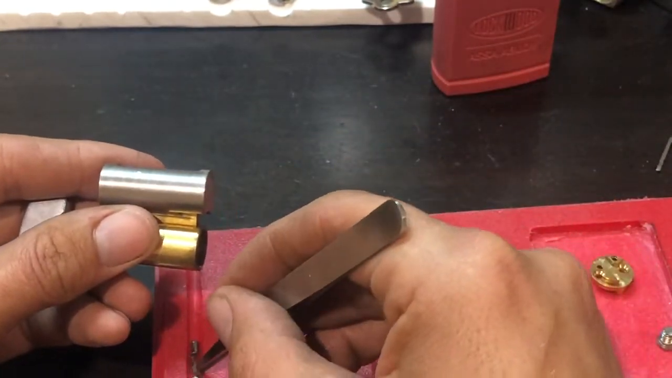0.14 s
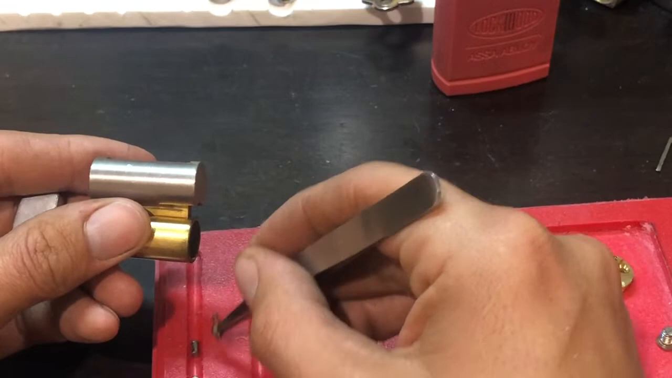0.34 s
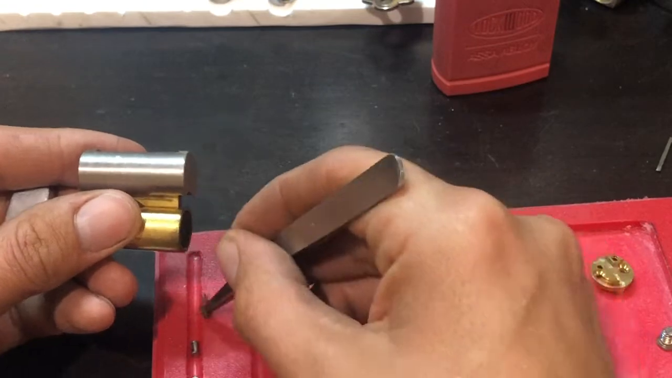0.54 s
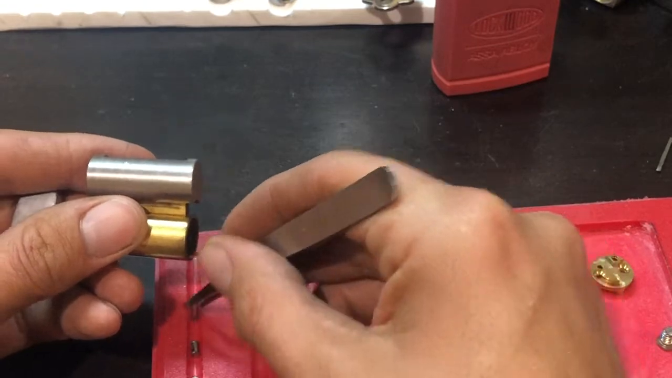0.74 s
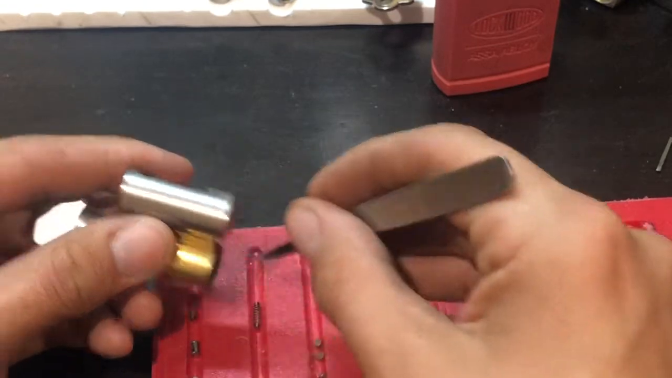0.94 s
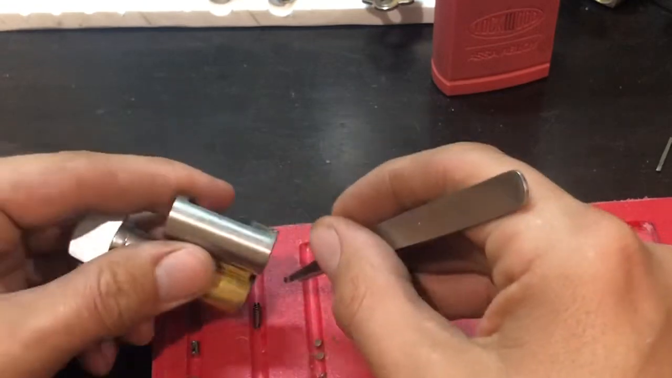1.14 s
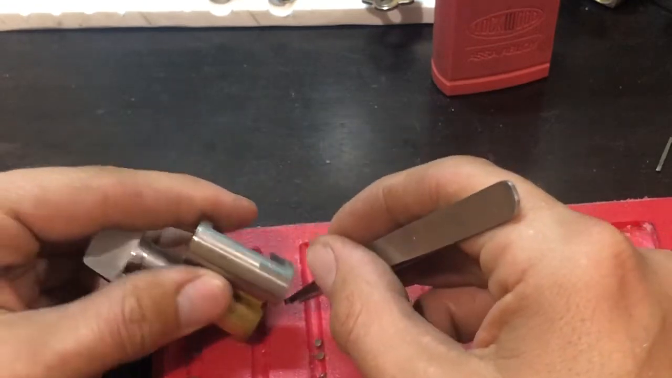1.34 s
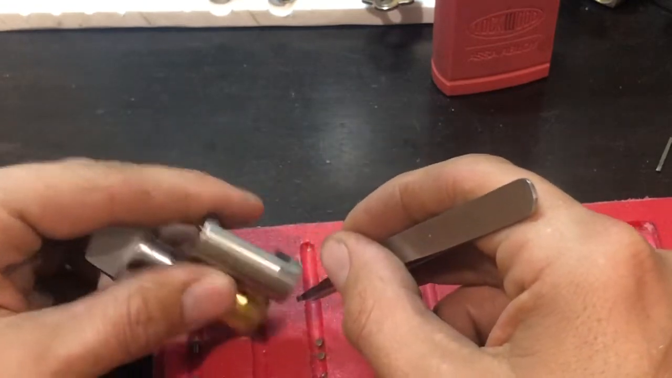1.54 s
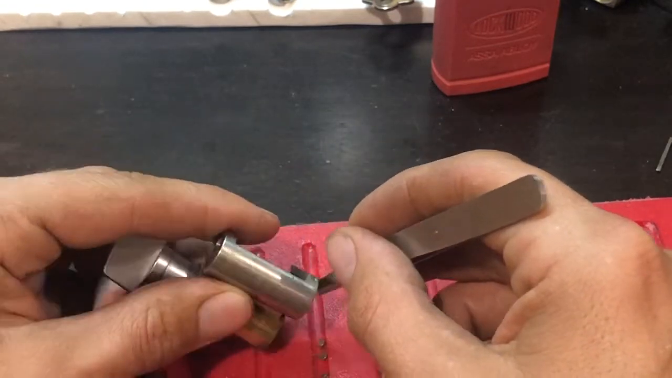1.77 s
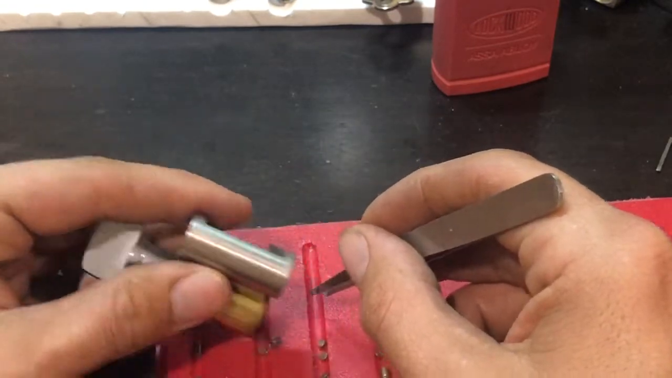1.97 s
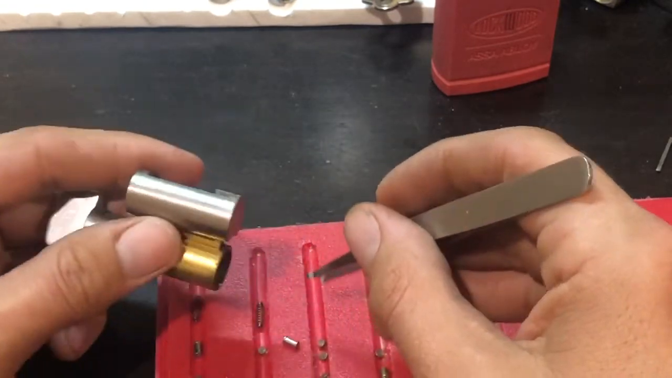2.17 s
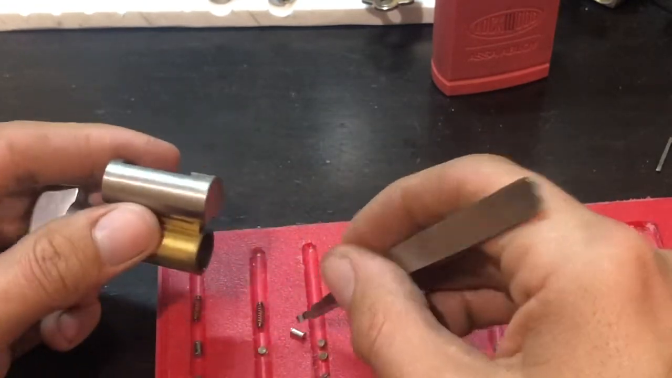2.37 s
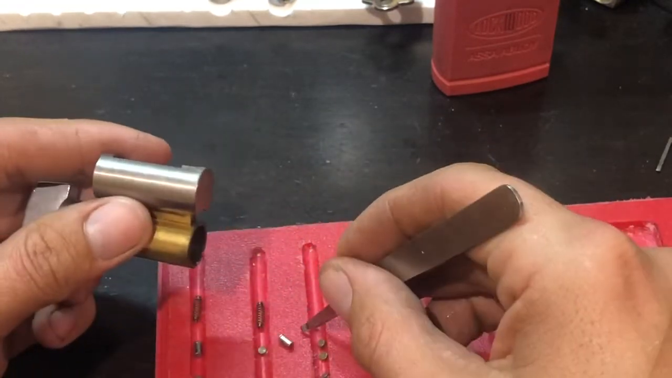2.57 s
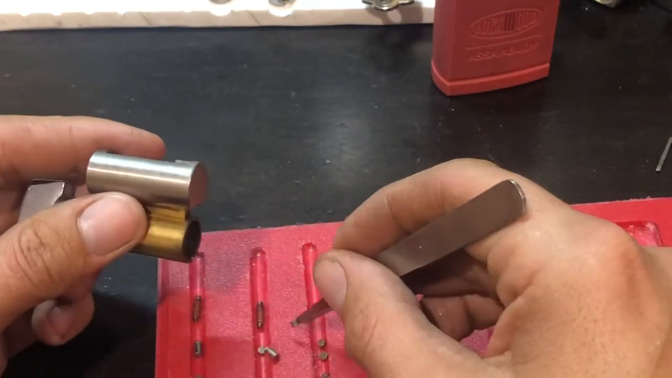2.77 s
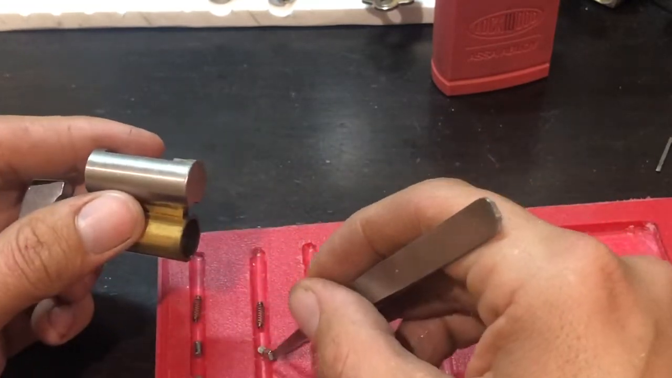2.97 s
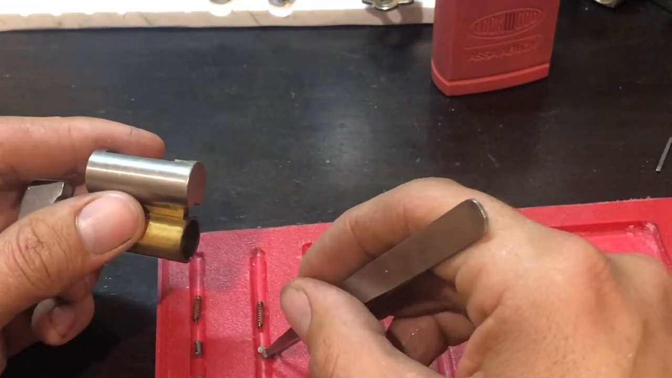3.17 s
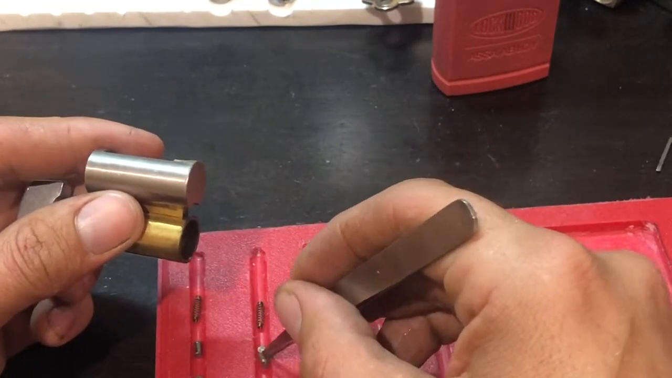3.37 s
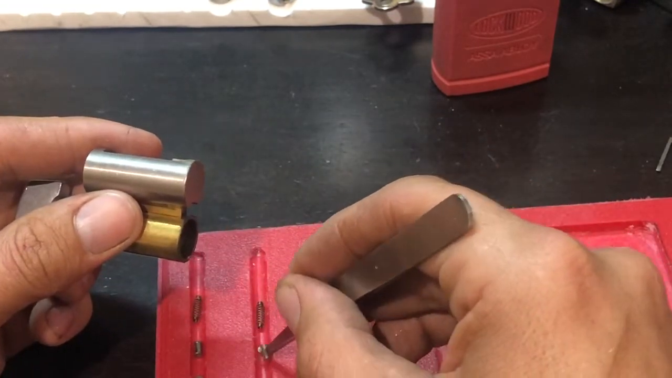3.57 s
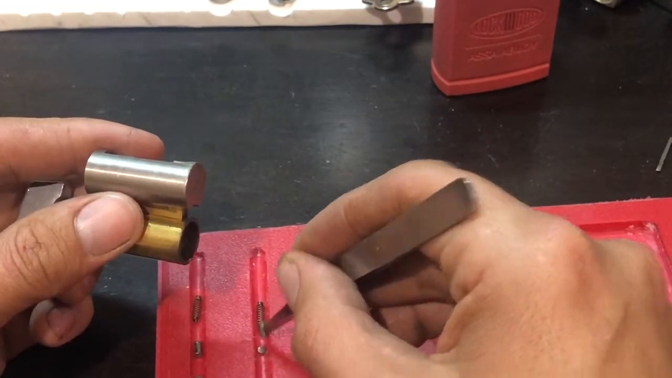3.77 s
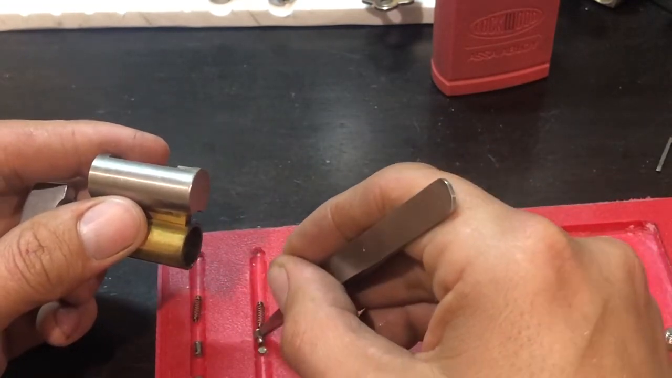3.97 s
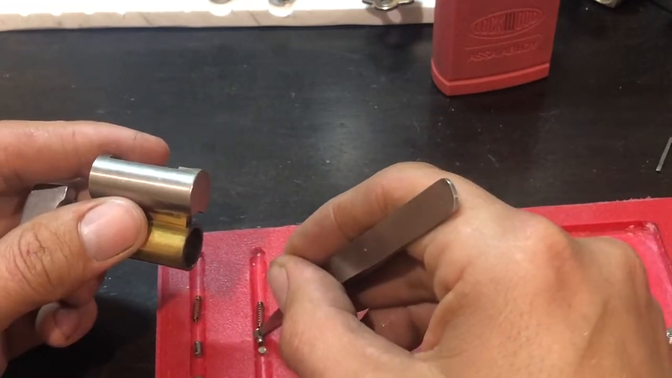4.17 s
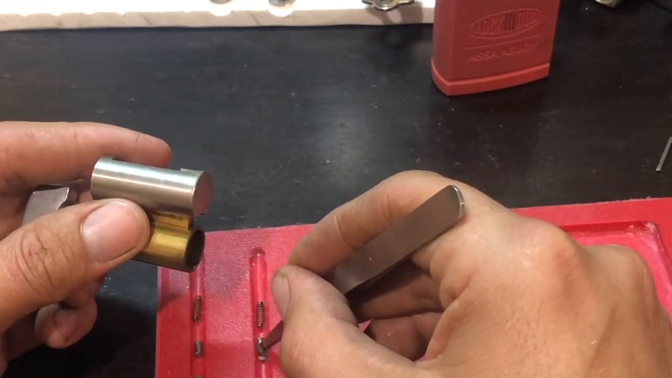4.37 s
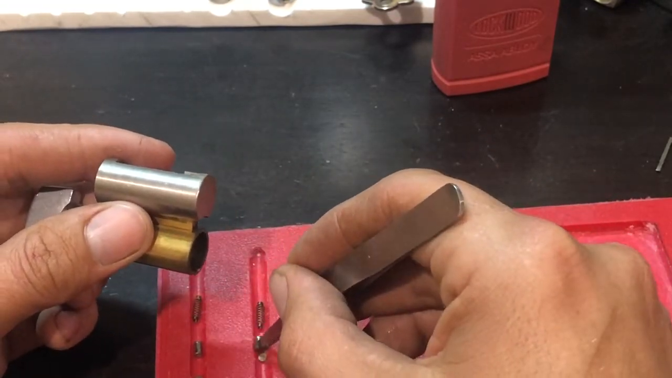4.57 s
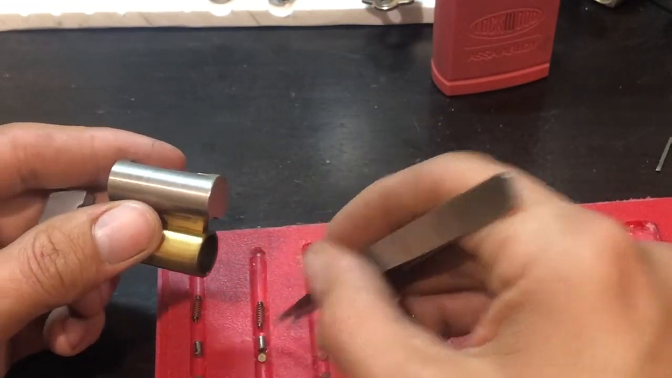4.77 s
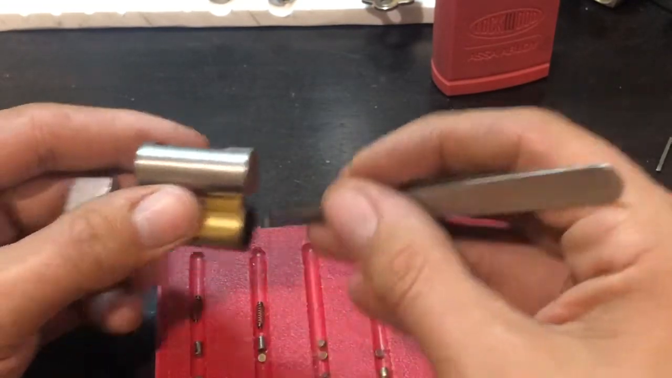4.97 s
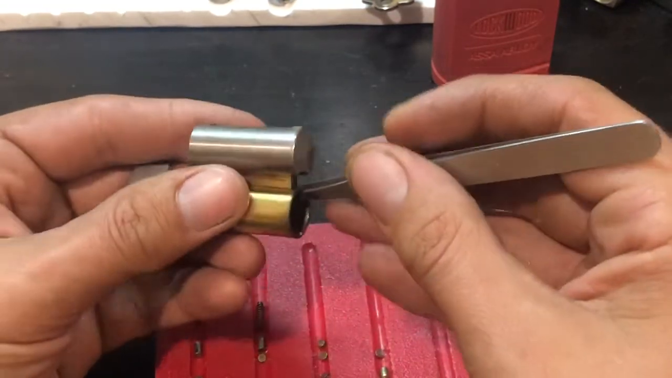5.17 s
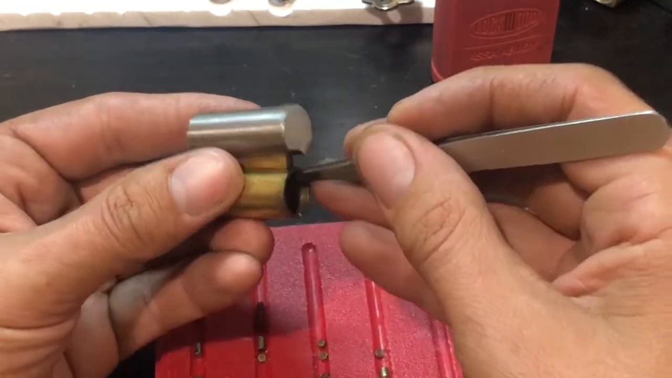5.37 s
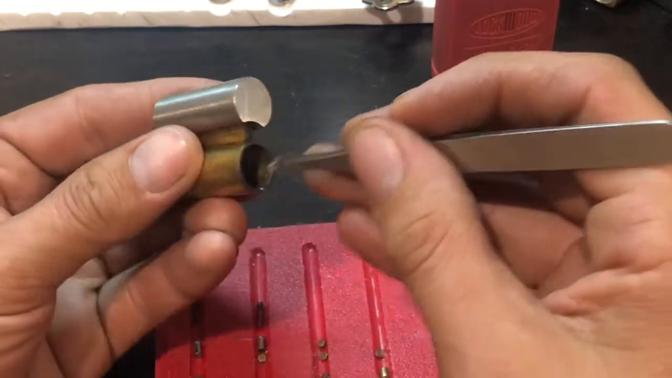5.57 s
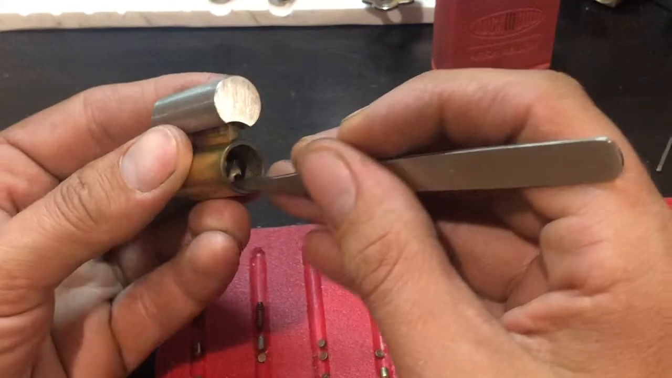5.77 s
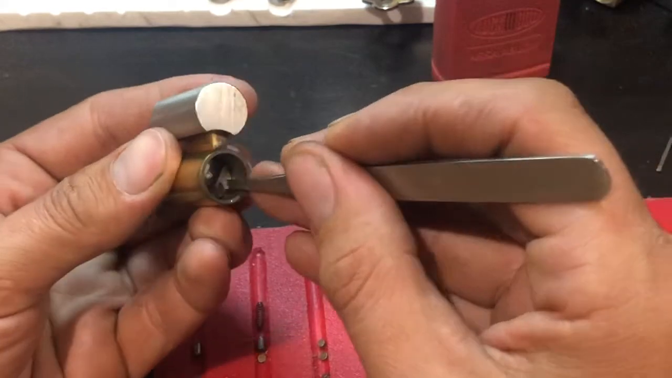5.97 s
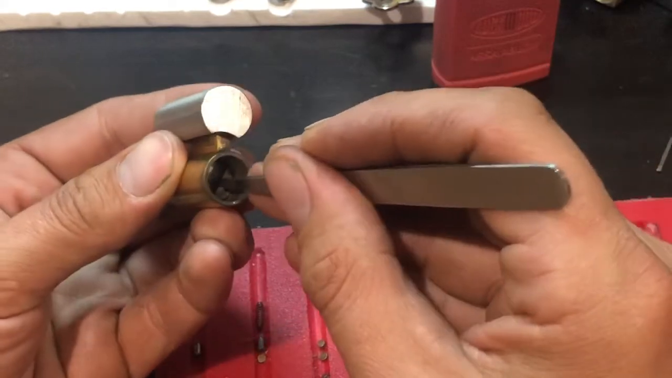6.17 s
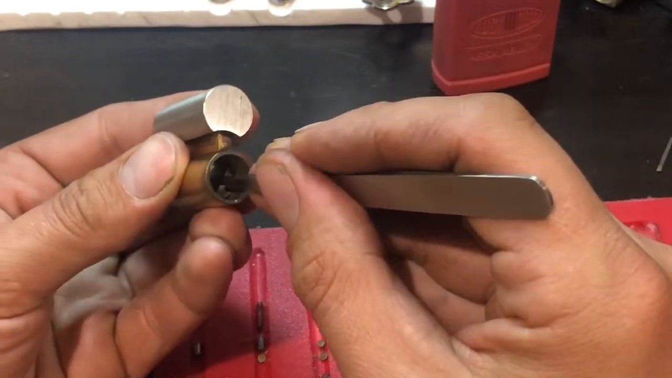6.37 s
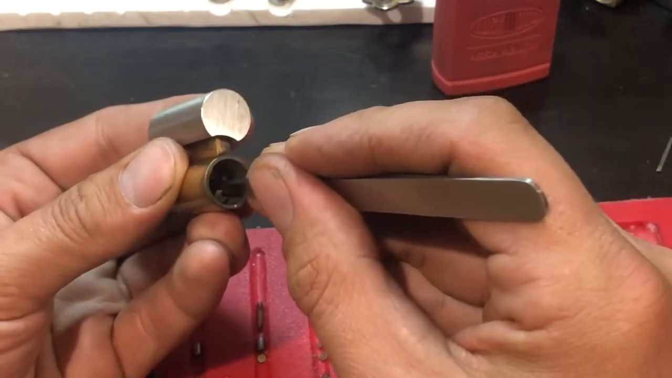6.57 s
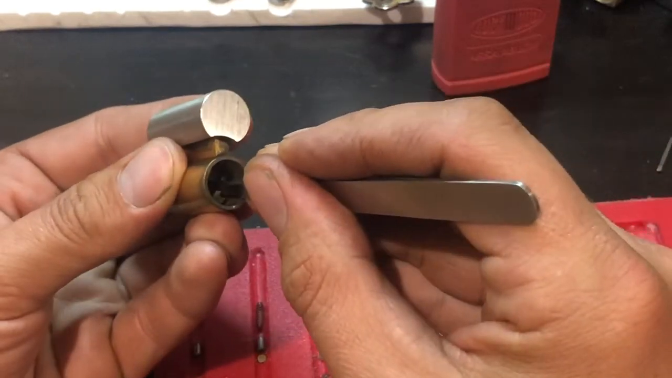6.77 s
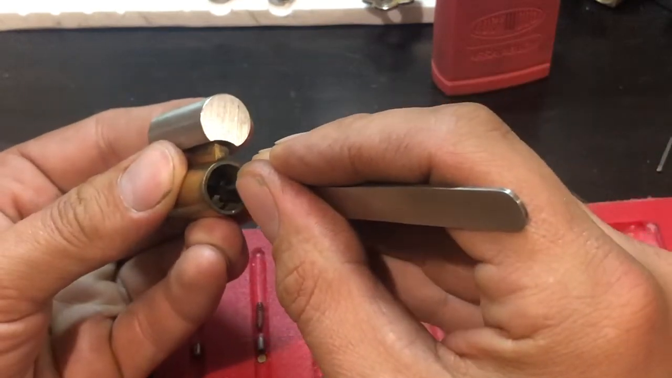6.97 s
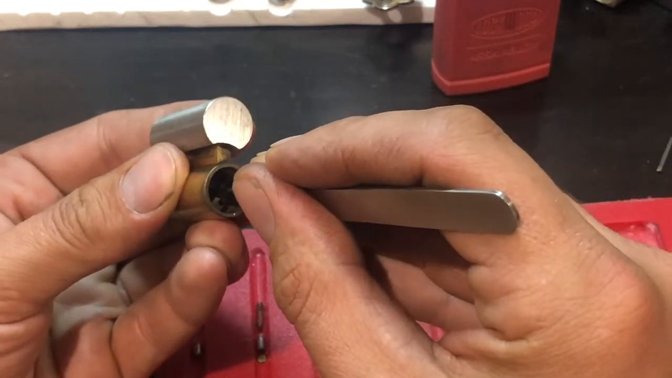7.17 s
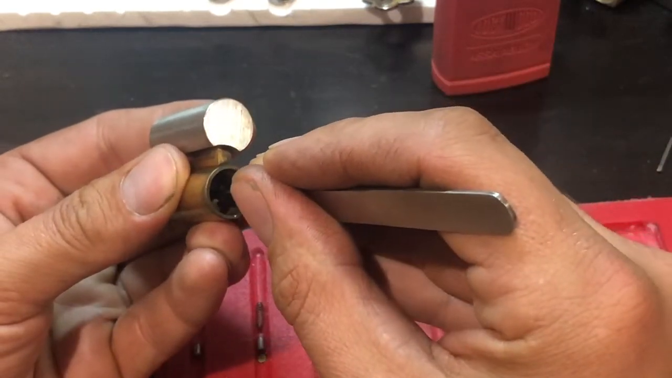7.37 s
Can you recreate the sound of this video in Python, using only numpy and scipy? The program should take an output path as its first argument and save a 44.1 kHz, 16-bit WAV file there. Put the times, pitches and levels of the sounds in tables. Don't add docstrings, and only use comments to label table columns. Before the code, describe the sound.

Close indoor bench sound. A brief sleeve rub and faint ticks lead to a brass lock cylinder knocked sharply on a plastic tray, the desk booming softly beneath. Loose pins rattle and bounce in its bore. Then tweezers pluck and tick brightly on small pins, with gentle brushes and scrapes. A small room reflects the contacts over low mains hum, fan tone and soft hiss.

```python
import sys
import numpy as np
from scipy import signal
from scipy.io import wavfile
from scipy.ndimage import uniform_filter1d

SR = 44100
rng = np.random.default_rng(int(sys.argv[2]) if len(sys.argv) > 2 else 0)


def generate_wav(signal):
    frames = np.transpose(np.atleast_2d(signal))
    scaled = np.clip(frames, -1, 1) * 32767
    pcm = np.round(scaled).astype(np.int16)
    wavfile.write(sys.argv[1], SR, pcm)


def volts(x):
    e = np.asarray(x, float) / 20
    return 10 ** e


N = 327663


def evened(x):
    return x / np.sqrt(np.mean(x ** 2) + 1e-20)


def peaked(x, db):
    return volts(db) * x / np.abs(x).max()


def read(points, hz):
    f, value = np.transpose(points)
    return np.interp(np.log(hz + 1), np.log(f + 1), value)


def add(mix, start_s, sound):
    part = mix[round(start_s * SR):][:len(sound)]
    part += sound[:len(part)]


def band(x, low_hz, high_hz):
    return signal.sosfilt(signal.butter(2, [low_hz, high_hz], "band", fs=SR, output="sos"), x)


def resonate(x, hz, width_hz):
    turn = np.exp(2j * np.pi * hz * np.arange(len(x)) / SR)
    r = np.exp(-np.pi * width_hz / SR)
    return 2 * (turn * signal.lfilter([1 - r], [1, -r], x / turn)).real


def resonate_twice(x, hz, width_hz):
    return resonate(resonate(x, hz, width_hz), hz, width_hz)


def swelling(x, rise_s):
    return x * (1 - np.exp(-np.arange(len(x)) / SR / rise_s))


def ring(modes, tilt_db, pivot_hz, scatter_db, length_s):
    hz, db, t60_s = np.transpose(modes)[:, :, None]
    t = np.arange(round(length_s * SR)) / SR
    strength, sign = rng.standard_normal((2, len(modes), 1))
    db = db + tilt_db * np.log2(hz / pivot_hz) / 3 + scatter_db * strength
    return (np.sign(sign) * volts(db - 60 * t / t60_s) * np.sin(2 * np.pi * hz * t)).sum(0)


def contact(rise_s, t60_s):
    t = np.arange(900) / SR
    return swelling(rng.standard_normal(900), rise_s) * volts(-60 * t / t60_s)


def slide(length_s, db, hz, width_hz):
    count = round(length_s * SR)
    slips = rng.standard_normal((6, count))
    flares = evened(uniform_filter1d(rng.standard_normal((6, count)), 200, axis=1))
    slips = slips * volts(3.5 * flares)
    spread = np.linspace(-.6, .6, 6) + 0.18 * rng.standard_normal(6)
    places = np.clip(hz + width_hz * spread, 200, 15600)
    rub = sum(evened(resonate_twice(x, f, width_hz / 3.7)) for x, f in zip(slips, places))
    return volts(db) * evened(rub) * signal.windows.tukey(count, .5)


def mains_and_motor():
    mains_hz = 50.03
    # multiple of the mains, level in dB rms
    harmonics = [(1, -70), (2, -68.5), (3, -72.5), (4, -79), (6, -76), (10, -77), (14, -82), (30, -85)]
    # time in seconds, turns lost against twice the mains, level in dB rms
    slip = [(0, .43, -74), (1, 4.96, -72), (4, 17.88, -71), (5.6, 25.15, -65.5), (7.43, 34.25, -70)]
    t = np.arange(N) / SR
    mains = np.zeros(N)
    for n, db in harmonics:
        phase = (n != 2) * rng.random()
        mains += volts(db) * np.cos(2 * np.pi * (n * mains_hz * t + phase))
    s, lost, motor_db = np.transpose(slip)
    turns = 2 * mains_hz * t - np.interp(t, s, lost)
    motor = volts(np.interp(t, s, motor_db)) * np.cos(2 * np.pi * turns)
    return np.sqrt(2) * (mains + motor)


def fan():
    # frequency in Hz, steady level in dB rms, wavering width in Hz, wavering level in dB rms
    tones = [(59.5, -89, 30, -80.5), (263.7, -70.5, 13, -72.5), (327, -66.5, 4, -67.5),
             (376.7, -84, 30, -82.5), (1870, -92, 26, -77), (1160, -83, 4.4, -86.5)]
    t = np.arange(N) / SR
    noise = rng.standard_normal(N)
    out = np.zeros(N)
    for hz, steady_db, width_hz, waver_db in tones:
        out += np.sqrt(2) * volts(steady_db) * np.cos(2 * np.pi * (hz * t + rng.random()))
        out += volts(waver_db) * evened(resonate_twice(noise, hz, width_hz))
    return out


def air():
    # frequency in Hz, relative density in dB per Hz
    air_density = [(21, -37), (35, -22), (102, -4.5), (194, -4.5), (332, -1.5), (429, -10), (614, -14),
                   (856, -10.5), (1290, -13), (1580, -16.5), (2710, -17), (4630, -24.5), (11000, -32.5),
                   (15800, -37)]
    # time in seconds, level in dB
    air_swell = [(0, -61), (.5, -63), (3.6, -63.5), (4.2, -64), (5.1, -60), (5.6, -63), (7.43, -63.5)]
    gain_db, hiss_edge_hz = 4.0, 15850
    count, hz = N // 512 + 5, np.fft.rfftfreq(2048, 1 / SR)
    real, imag, patches = rng.standard_normal((count, 1025, 3)).T
    patches = evened(uniform_filter1d(uniform_filter1d(patches, 20, 0), 8, 1))
    swell_db = np.interp(np.arange(count) * 512 / SR, *np.transpose(air_swell))
    share = np.exp(-(np.log2(hz / 1500 + 1e-9) / 1.9) ** 2)[:, None]
    db = read(air_density, hz)[:, None] + 0.6 * patches + share * (swell_db - swell_db.mean())
    z = (real + 1j * imag) * volts(db) * (hz < hiss_edge_hz)[:, None]
    hiss = signal.istft(z, nperseg=2048, noverlap=1536)[1][:N]
    return volts(swell_db.mean() + gain_db) * evened(hiss)


def room(x):
    # frequency in Hz, t60 in seconds
    decay = [(130, 0.85), (300, 0.63), (1000, 0.47), (3000, 0.55), (8000, 0.49), (16000, 0.21)]
    # frequency in Hz, tail level in dB
    wet = [(250, -2.5), (500, -8), (1200, -2.5), (2300, -5), (4000, -5), (6300, -14.5), (9000, -11.5),
           (15600, -13), (16000, -45)]
    early_db, early_s = 14, 0.0069
    taps = np.zeros(SR)
    at = np.arange(50, SR - 20, 20)
    strength = volts(early_db * np.exp(-at / SR / early_s))
    taps[at + rng.integers(0, 20, len(at))] = rng.choice([-1., 1.], len(at)) * strength
    hz, t, z = signal.stft(taps, SR, nperseg=128)
    z = z * volts(-60 * t / read(decay, hz)[:, None])
    z = z / np.linalg.norm(z, axis=1, keepdims=True)
    flat = signal.istft(z, SR, nperseg=128)[1]
    tail = signal.istft(z * volts(read(wet, hz))[:, None], SR, nperseg=128)[1] / np.linalg.norm(flat)
    return signal.fftconvolve(x, tail)[:N]


def echo(x):
    shift_hz = 40
    sway = 2 * np.pi * shift_hz * np.arange(N) / SR
    return room(x * np.cos(sway)) + room(x * np.sin(sway))


def sleeve():
    # start in seconds, length in seconds, level in dB rms, centre in Hz, width in Hz
    slides = [
        (.001, .25, -65, 1300, 1200),
        (.001, .24, -75, 4100, 500),
        (5.66, .19, -77, 4350, 600),
        (6.601, .06, -66, 1400, 1600),
    ]
    out = np.zeros(N)
    for s, *row in slides:
        add(out, s, slide(*row))
    return out


def boom(db, tilt_db):
    # frequency in Hz, level in dB, t60 in seconds
    desk_modes = [(116, -10, 0.28), (137.2, -4, 0.49), (176.7, -10.5, 0.29), (263, -2.5, 0.23),
                  (308, -12, 0.25), (375.3, -1, 0.15), (490, -10, 0.2)]
    return peaked(swelling(ring(desk_modes, tilt_db, 256, 0.31, .6), 0.0014), db)


def knock(db, sharp_db):
    # frequency in Hz, level in dB, t60 in seconds
    tray_modes = [(450, -10, 0.055), (554, -12.5, 0.04), (676, -9, 0.039), (705, -6, 0.03), (925, 0, 0.032),
                  (1030, -1, 0.013), (1201, -3, 0.038), (1255, -19.5, 0.032), (1500, -4.5, 0.014),
                  (1692, 2, 0.0095), (1790, -9, 0.021), (2060, -8, 0.0088), (2290, -7.5, 0.022),
                  (2630, -5, 0.0091), (3030, -3, 0.0075), (3620, -12, 0.0071), (4400, -1, 0.0027),
                  (4870, -14, 0.0089)]
    return peaked(swelling(ring(tray_modes, sharp_db, 1000, 0.79, .1), 0.00017), db)


def blows():
    # start in seconds, peak in dB, sharpness in dB, rebound loss in dB, desk boom in dB
    hits = [
        (.55, -43, -2, -1.5, -47),
        (.611, -53, 0, -3, -53),
        (1.3699, -28.5, -19, 16, -36.5),
        (1.6304, -7.5, 1, 2, -20.5),
        (1.8217, -20.5, -11, 4.5, -26.5),
        (2.507, -44.5, -20, -1, -44),
        (2.955, -48, -23, 18, -50.5),
        (3.918, -53, -18, 13, -54),
        (4.291, -60, -9, 15, -54),
    ]
    rebound_s, rebound_dull_db = .0042, 3
    settle_s, settle_db = .012, 16
    boom_tilt_db, boom_tilt_share = 14, .4
    tray, desk = np.zeros((2, N))
    for s, db, sharp_db, loss_db, boom_db in hits:
        add(tray, s, knock(db, sharp_db))
        add(tray, s + rebound_s, knock(db - loss_db, sharp_db - rebound_dull_db))
        add(tray, s + settle_s, knock(db - settle_db, sharp_db))
        add(desk, s, boom(boom_db, boom_tilt_db + boom_tilt_share * db))
    return tray, desk


def touches():
    # start in seconds, peak in dB, sharpness in dB
    taps = [(1.3656, -32, 1), (1.629, -16.5, -4), (1.640, -23, 13.5), (2.465, -44.5, 11),
            (2.517, -47.5, -27), (3.461, -48, 10), (4.273, -55, -13), (4.309, -68, -16), (4.808, -48, -10),
            (5.147, -39.5, 34), (6.291, -65, -9)]
    out = np.zeros(N)
    for s, *row in taps:
        add(out, s, knock(*row))
    return out


def rattle(db, bright_db):
    # frequency in Hz, level in dB, t60 in seconds
    cylinder_modes = [(2500, -19, 0.0051), (2940, -24.5, 0.022), (3620, -15.5, 0.0055), (4600, -3, 0.0028),
                      (5540, -7.5, 0.0045), (6170, -3, 0.0079), (6640, -13.5, 0.015), (7450, -3.5, 0.0021)]
    bore = swelling(ring(cylinder_modes, 0, 6300, 0.53, .05), 0.00037)
    force = np.r_[contact(.0004, .009), np.zeros(len(bore) - 900)]
    crack = band(force, 7600, 12500)
    return peaked(peaked(bore, 0) + peaked(crack, bright_db + 7), db)


def bouncing(db, flight_s, loss_db, bright_db, spring=1, count=3):
    dulling_db = 0.5
    out = np.zeros(SR // 5)
    flights_s = flight_s * spring ** np.arange(count - 1)
    for k, at_s in enumerate(np.r_[0, np.cumsum(flights_s)]):
        add(out, at_s, rattle(db - k * loss_db, bright_db - k * dulling_db))
    return out


def loose_pins():
    # start in seconds, peak in dB, first flight in seconds, loss per bounce in dB, crack in dB
    bounces = [(1.3656, -39, 0.0062, 9, -18), (1.6306, -18, 0.0042, 16, -13.5),
               (1.6398, -25, .0107, 11, -18), (1.6634, -29, .0035, 17, -11), (1.6664, -24, .0213, 12, -16),
               (1.693, -47, .0095, 1, -16), (1.7892, -45, .01, 20, -13), (1.8202, -30, 0.0091, 5, -16),
               (1.8381, -31.5, .015, 20, -13), (2.055, -35, 0.0054, 9, -19), (2.7638, -50.5, .01, 20, -29),
               (2.95, -53, .01, 20, -24), (3.426, -55, .01, 20, -16)]
    out = np.zeros(N)
    for s, *row in bounces:
        add(out, s, bouncing(*row))
    drop = bouncing(-28.5, flight_s=.0232, loss_db=4, bright_db=-16, spring=.665, count=5)
    add(out, 2.0341, drop)
    return out


def scrapes():
    # start in seconds, length in seconds, level in dB rms, centre in Hz, width in Hz
    rubs = [(2.461, .01, -60, 4600, 210), (5.149, 0.0095, -57, 2450, 370),
            (4.257, 0.065, -60.5, 685, 366.7), (5.033, .015, -65, 5600, 1000),
            (5.375, 0.046, -60.5, 6500, 3287), (5.397, .0121, -62, 4400, 400),
            (5.906, 0.047, -69, 5157, 1500), (6.599, 0.038, -58.5, 2500, 4200),
            (6.598, .012, -65, 9000, 7000), (5.024, 0.057, -65, 11000, 900),
            (5.146, 0.0054, -52, 4600, 600)]
    out = np.zeros(N)
    for s, *row in rubs:
        add(out, s, slide(*row))
    return out


def brushes():
    # start in seconds, length in seconds, level in dB rms
    strokes = [(.072, 0.033, -72), (.248, .014, -65), (.92, .03, -74), (3.882, .026, -72),
               (4.67, .043, -76), (4.85, 0.093, -74), (5.023, .035, -68), (5.155, .08, -75),
               (5.364, 0.05, -62), (5.691, .026, -71), (5.905, 0.049, -74), (.687, .008, -70)]
    out = np.zeros(N)
    for s, *row in strokes:
        add(out, s, slide(*row, hz=12300, width_hz=4600))
    return out


def tick(db, tip_hz, body_db, t60_s, tine_db):
    shank_hz, tine_hz, tine_t60_s = 5000, 3080, .065
    force = np.r_[contact(.0003, .9 * t60_s), np.zeros(3000)]
    body = band(force, 5300, 8300) + 1.3 * resonate(force, shank_hz, 600)
    crack = band(force, 6960, 14400) + volts(body_db - 4.5) * body
    tips = resonate(force, tip_hz, 1150)
    tine = resonate(force, tine_hz, 2.2 / tine_t60_s)
    return peaked(peaked(crack, 0) + peaked(tips, -6.5) + peaked(tine, tine_db), db)


def tweezers():
    # start in seconds, peak in dB, loudest ring in Hz, body under the crack in dB
    ticks = [(.1363, -56, 7100, 6), (0.5483, -47, 5800, 7), (0.6097, -54, 5900, 6),
             (.6804, -49.5, 12300, -10), (0.996, -46, 10700, -3), (1.6728, -22, 12000, -15),
             (1.675, -24.5, 9600, -1), (2.4635, -41, 12200, 5), (2.4708, -47, 9200, -1),
             (2.5038, -52, 10200, 18), (3.4565, -50, 11000, -4), (3.467, -35, 11100, -9),
             (3.471, -40, 12300, 2), (3.8512, -56, 5600, 16), (4.3073, -57, 12500, 0),
             (4.5239, -53, 12300, 12), (4.5407, -41, 11100, 3), (4.8063, -53, 10700, 15),
             (5.0232, -40.5, 10900, 5), (5.031, -43, 11300, 0), (5.1468, -29, 11600, 7),
             (5.1903, -56, 12300, 1), (5.2573, -43.5, 11700, 3), (5.4586, -60, 10800, -8),
             (5.6665, -43.5, 13800, 2), (6.203, -50.5, 10800, -8)]
    # start in seconds, peak in dB, loudest ring in Hz, body in dB, tine ring in dB
    plucks = [
        (3.3458, -37.5, 12200, 3, -15),
        (3.3786, -54, 6700, 18, -12),
        (3.3825, -46, 5900, 6, -7),
        (3.3894, -44, 14100, 3, -18),
        (3.4619, -23, 5240, -8, -18.5),
    ]
    out = np.zeros(N)
    for s, *row in ticks:
        add(out, s, tick(*row, t60_s=0.013, tine_db=-47))
    for s, db, tip_hz, body_db, tine_db in plucks:
        add(out, s, tick(db, tip_hz, body_db, 0.0067, tine_db))
    return out


def scene():
    background = mains_and_motor() + fan() + air()
    tray, booms = blows()
    desk = sleeve() + tray + touches() + loose_pins() + scrapes() + brushes() + tweezers()
    bass_cut = signal.butter(4, 83, "high", fs=SR, output="sos")
    desk, booms = signal.sosfilt(bass_cut, [desk, booms])
    return (desk + booms + echo(desk) + background)[None]


def roll_off(x):
    return signal.sosfilt(signal.butter(12, 17000, fs=SR, output="sos"), x)


def record(dry):
    edge_hz = 16700
    lowpass = signal.firwin(511, edge_hz, window=("kaiser", 9), fs=SR)
    limited = signal.oaconvolve(dry, lowpass[None], "same")
    return roll_off(limited)


dry = scene()
out = record(dry)
generate_wav(out)
```